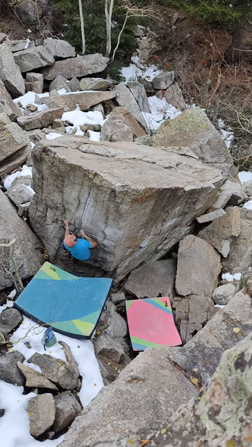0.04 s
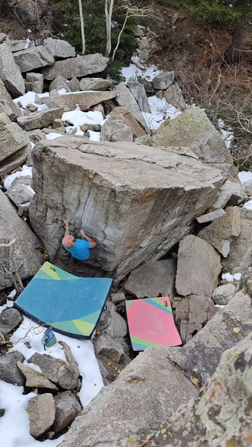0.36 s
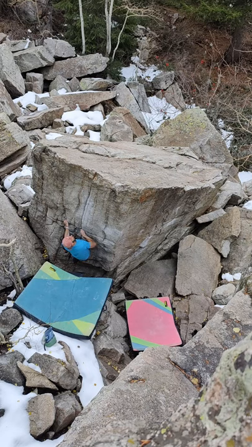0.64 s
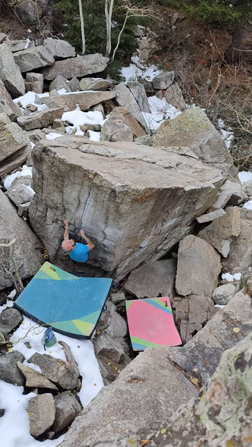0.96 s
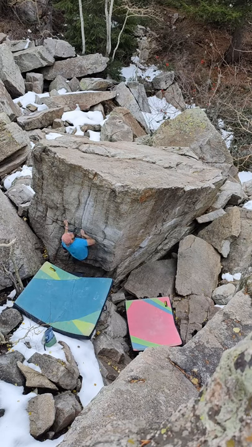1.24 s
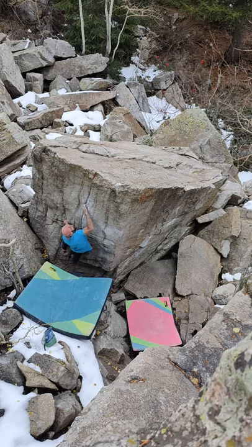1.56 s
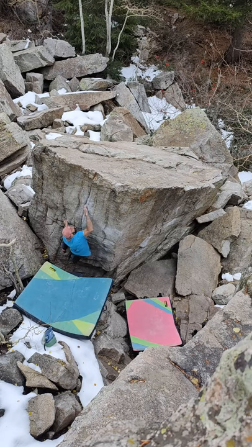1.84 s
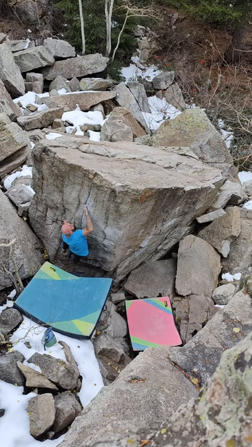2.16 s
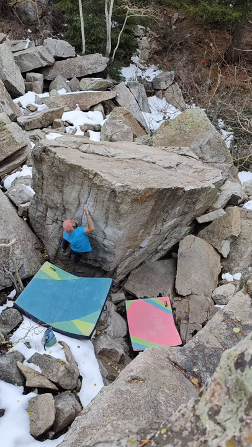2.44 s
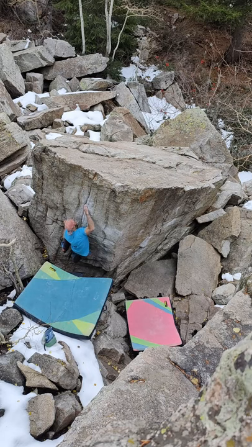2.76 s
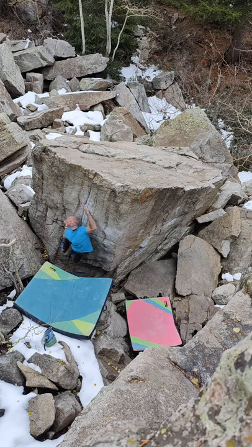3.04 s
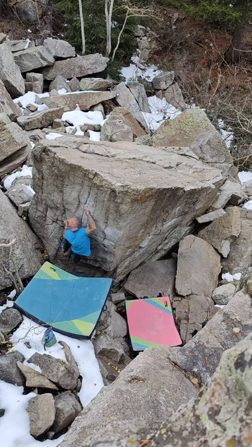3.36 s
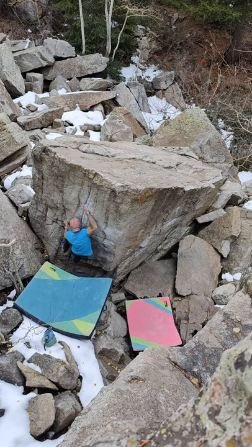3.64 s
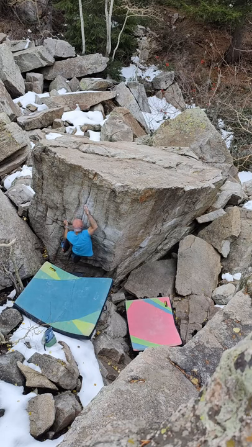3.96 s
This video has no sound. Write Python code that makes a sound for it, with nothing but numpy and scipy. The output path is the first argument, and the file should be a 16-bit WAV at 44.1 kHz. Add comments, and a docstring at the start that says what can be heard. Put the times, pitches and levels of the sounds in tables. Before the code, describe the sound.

Wind buffets the microphone outdoors in a rocky canyon, with low gusts and small puffs. Behind it lies a faint, steady rush like a creek, and in the second half a distant roar, probably a car, swells and eases.

```python
"""Wind on a microphone in a canyon

Turbulent wind buffets the two ports of a phone microphone in a rocky canyon, in gusts and single puffs.
Behind the low rumble lies a steady distant wash, as of a creek. In the second half a far roar,
probably a car on the canyon road, swells on the right and starts to recede."""
import sys
import numpy as np
from scipy import signal
from scipy.fft import rfft, irfft
from scipy.io import wavfile
from scipy.ndimage import uniform_filter1d

SR = 44100
rng = np.random.default_rng(int(sys.argv[2]) if len(sys.argv) > 2 else 0)


def put_to_file(sound):
    """Save the sound as 16-bit audio at rate SR, in the file named by the first command-line argument."""
    columns = np.atleast_2d(sound).T  # one column per channel
    safe = np.clip(columns, -1, 1)
    whole_steps = np.round(safe * 32767)
    wavfile.write(sys.argv[1], SR, whole_steps.astype(np.int16))


N = 176400
FRAME, HOP = 1024, 256  # short-time spectra [samples]


def amp(db):
    """Amplitude ratio of a level in decibels."""
    return 10 ** (np.asarray(db) / 20)


def unit_rms(x):
    """Normalisation to rms 1."""
    return x / np.sqrt(np.mean(x ** 2) + 1e-20)


def at_hz(points, hz):
    """Interpolation of a spectrum on a log-frequency axis."""
    f, value = np.transpose(points)
    return np.interp(np.log(hz + 1), np.log(f + 1), value)


def at_time(points, t, column=1):
    """Linear interpolation of one column of an envelope."""
    columns = np.transpose(points)
    return np.interp(t, columns[0], columns[column])


def wander(rate_hz):
    """Low-pass noise of rms 1: a smooth random modulation."""
    hz = np.fft.rfftfreq(N, 1 / SR)
    return unit_rms(irfft(rfft(rng.standard_normal(N)) * np.exp(-(hz / rate_hz) ** 2), N))


def grid():
    """Time-frequency plane: frame times (column) and bin frequencies (row)."""
    return np.arange(N // HOP + 2)[:, None] * HOP / SR, np.fft.rfftfreq(FRAME, 1 / SR)


def eddies(spectrum, gust_s=0.33):
    """Turbulent pressure is coloured noise, here held near rms 1 over the length of a gust."""
    hz = np.fft.rfftfreq(N, 1 / SR)
    colour = amp(at_hz(spectrum, hz)) / (1 + (hz / 3000) ** 2)
    pressure = irfft(rfft(rng.standard_normal(N)) * colour, N)
    span = int(gust_s * SR)
    local_power = uniform_filter1d(uniform_filter1d(pressure ** 2, span), span // 2)
    return pressure / np.sqrt(local_power)


def buffeting(gusts, rumble_db, flutter_db, bursts_db):
    """Turbulence at one port: large eddies rumble, small ones flutter, higher in stronger wind."""
    # spectra of the large and the small eddies (frequency [Hz], relative level [dB])
    large_eddies = [(8, -3.5), (33, 2), (52, -1.5), (75, -6), (110, -14), (200, -25), (500, -79)]
    small_eddies = [(40, -3.5), (80, -3), (115, -0.5), (200, -5), (280, -11.5), (400, -21.5), (600, -35.5),
                    (1500, -77)]
    breeze_db, octaves_per_db = -36.5, 0.02
    t, hz = np.arange(N) / SR, np.fft.rfftfreq(N, 1 / SR)
    strength_db = at_time(gusts, t, column=2)
    pitch_ratio = 2 ** (octaves_per_db * (strength_db - breeze_db))  # stronger wind sheds faster eddies
    spectrum, flutter = rfft(eddies(small_eddies)), np.zeros(N)
    for centre_hz in 50 * 2. ** np.arange(6):
        octave = np.maximum(1 - abs(np.log2((hz + 1e-6) / centre_hz)), 0)
        shift_db = at_hz(small_eddies, centre_hz / pitch_ratio) - at_hz(small_eddies, centre_hz)
        flutter += irfft(spectrum * octave, N) * amp(shift_db)
    flutter *= unit_rms(amp(bursts_db * wander(rate_hz=40.5)))  # small eddies arrive in bursts
    rumble = eddies(large_eddies) * amp(at_time(gusts, t) + rumble_db)
    return rumble + flutter * amp(strength_db + flutter_db)


def distant(density_db, pan, coherence, patchy_db):
    """Far noise with drifting patches reaches two spaced ports partly coherent and shifted in phase."""
    # lead of the left port (frequency [Hz], phase [rad])
    port_phase = [(420, 0.14), (540, 0.91), (690, 1.78), (870, 2.04), (1130, 2.27), (1650, 2.56),
                  (2050, 2.57), (3400, 2), (4300, 3.1), (6700, 4.5)]
    t, hz = grid()
    a, b, c, d, patches = rng.standard_normal((5, len(t), len(hz)))
    patches = uniform_filter1d(patches, size=16, axis=0)  # smooth in time
    patches = unit_rms(uniform_filter1d(patches, size=9, axis=1))  # and in frequency
    left, independent = a + 1j * b, c + 1j * d
    shared = np.clip(at_hz(coherence, hz), 0, 1)
    right = (shared * left + np.sqrt(1 - shared ** 2) * independent) * np.exp(-1j * at_hz(port_phase, hz))
    lean = amp(at_hz(pan, hz) / 2)
    magnitude = amp(density_db + patchy_db * patches) * np.sqrt(SR / HOP) / 2
    spectra = np.array([left * lean, right / lean]) * magnitude
    return signal.istft(spectra, nperseg=FRAME, noverlap=FRAME - HOP, time_axis=1, freq_axis=2)[1][:, :N]


def wash(gain_db=1.5):
    """Stationary broadband noise: the steady far rush of the canyon, as of a creek."""
    # spectrum of the rush (frequency [Hz], relative level [dB])
    spectrum = [(60, -75), (400, -76), (570, -75.2), (690, -78.5), (820, -75.7), (1250, -83), (1550, -86.3),
                (3000, -101.5), (4200, -105), (5800, -111.5), (6700, -111), (8200, -124), (15000, -140)]
    # balance of the ports (frequency [Hz], left minus right [dB])
    pan = [(200, -0.5), (400, -5), (600, -11), (850, -0.5), (1200, 1.5), (2000, 5), (2900, 11), (6700, 7.5)]
    # likeness of the ports (frequency [Hz], coherence [0-1])
    coherence = [(100, 0.82), (500, 1), (1250, 0.97), (1600, 0.29), (6000, 0.11)]
    _, hz = grid()
    return distant(gain_db + at_hz(spectrum, hz), pan, coherence, patchy_db=0.83)


def puffs():
    """A vortex striking a port is a bipolar pulse: suction builds, snaps over to pressure and ebbs."""
    # single vortices (time [s], strength [dB], decay time [s], snap time [s])
    vortices = [(0.182, -13, 0.0015, 0.001), (0.531, -17.5, 0.01, 0.0011), (1.081, -18, 0.004, 0.001),
                (1.558, -14, 0.003, 0.0013), (1.632, -5.5, 0.0069, 0.0042), (1.645, -9, 0.0077, 0.0016),
                (3.688, -10, 0.0019, 0.00098), (3.757, -23.5, 0.0046, 0.00074),
                (3.862, -18, 0.0077, 0.00063), (3.922, -7, 0.0025, 0.0013), (3.96, -10, 0.005, 0.0015)]
    t, pressure = np.arange(N) / SR, np.zeros(N)
    for when, db, decay, snap in vortices:
        pressure += amp(db) * np.tanh((t - when) / snap) * np.exp(-np.hypot(t - when, snap) / decay)
    return pressure


def passing_car(gain_db=1, treble_above_hz=790):
    """Rolling noise of far tyres swells on approach, brightens at the crest and starts to recede."""
    # envelope of the pass (time [s], level [dB])
    swell = [(0, -28), (1.9, -15), (2.4, -11), (2.62, -4.5), (2.88, -3), (3.15, -0.2), (3.35, -1.15),
             (4, -4)]
    # extra gain of the treble (time [s], level [dB])
    brightness = [(2.75, -2.5), (2.95, 0.7), (3.38, 0.5), (3.5, -3), (4, 1)]
    # spectrum of the roar (frequency [Hz], relative level [dB])
    spectrum = [(60, -70), (200, -66), (480, -68), (590, -63), (780, -64.5), (1230, -75.5), (1470, -75),
                (1650, -78), (1900, -83), (2900, -100), (4000, -102), (5800, -110.5), (6700, -108.5),
                (8500, -123)]
    # balance of the ports (frequency [Hz], left minus right [dB])
    pan = [(200, -6), (400, -3), (600, -9), (800, -1.5), (1050, 0.5), (1450, 8), (1900, 4), (2900, 17),
           (4000, 12), (6700, 9)]
    # likeness of the ports (frequency [Hz], coherence [0-1])
    coherence = [(100, 0.74), (500, 1), (1700, 0.91), (4000, 0.82), (7000, 0.13)]
    t, hz = grid()
    treble = hz ** 4 / (hz ** 4 + treble_above_hz ** 4)
    swell_db = at_time(swell, t) + treble * at_time(brightness, t)
    return distant(gain_db + at_hz(spectrum, hz) + swell_db, pan, coherence, patchy_db=0.85)


def scene():
    """Superposition: turbulence is local to each port, while distant sound reaches both."""
    # wind at each port (time [s], relative rumble level [dB], relative flutter level [dB])
    gusts_left = [(0, -28, -27), (0.07, -26, -58), (0.17, -27.5, -35.5), (0.27, -30.5, -52),
                  (0.41, -33, -51), (0.52, -23.5, -41.5), (0.65, -38, -41.5), (0.8, -31, -51),
                  (0.92, -33, -45.5), (1.08, -31, -41.5), (1.36, -37, -46), (1.54, -23.5, -34),
                  (1.63, -21.5, -40.5), (1.74, -30.5, -42), (1.91, -23, -41.5), (2.35, -34, -51),
                  (2.57, -29, -50), (2.67, -25, -49), (2.8, -34.5, -55), (3.42, -34, -59),
                  (3.58, -27.5, -46), (3.8, -33, -39), (3.95, -22, -32.5)]
    gusts_right = [(0, -35.5, -52), (0.17, -28.5, -48), (0.28, -24, -34), (0.5, -27, -39),
                   (0.66, -27.5, -42.5), (0.78, -33.5, -45), (1.0, -36.5, -42.5), (1.16, -26, -39.5),
                   (1.35, -28.5, -47.5), (1.56, -29, -32), (1.63, -23, -40.5), (1.7, -28.5, -33),
                   (1.77, -26.5, -35.5), (1.92, -21.5, -32.5), (2.08, -24.5, -28), (2.29, -25.5, -32),
                   (2.39, -27, -38.5), (2.48, -29, -36), (2.58, -26.5, -45.5), (2.75, -24, -34.5),
                   (2.84, -33, -38), (3.2, -25.5, -41), (3.45, -31.5, -43.5), (3.82, -29.5, -47),
                   (3.93, -30.5, -47)]
    left = buffeting(gusts_left, rumble_db=0.5, flutter_db=1.5, bursts_db=3.5) + puffs()
    right = buffeting(gusts_right, rumble_db=0.5, flutter_db=2.5, bursts_db=2.5)
    return np.array([left, right]) + wash() + passing_car()


def record(dry):
    """The microphone adds white self-noise, and a linear-phase low-pass limits the bandwidth."""
    hiss_density_db, cutoff_hz = -116, 15600
    hiss = amp(hiss_density_db) * np.sqrt(SR / 2) * rng.standard_normal(dry.shape)
    lowpass = signal.firwin(511, cutoff_hz, window=("kaiser", 9), fs=SR)
    padded = np.pad(dry + hiss, ((0, 0), (255, 255)), "reflect", reflect_type="odd")
    return signal.oaconvolve(padded, lowpass[None], "valid")


dry = scene()
out = record(dry)
put_to_file(out)
```